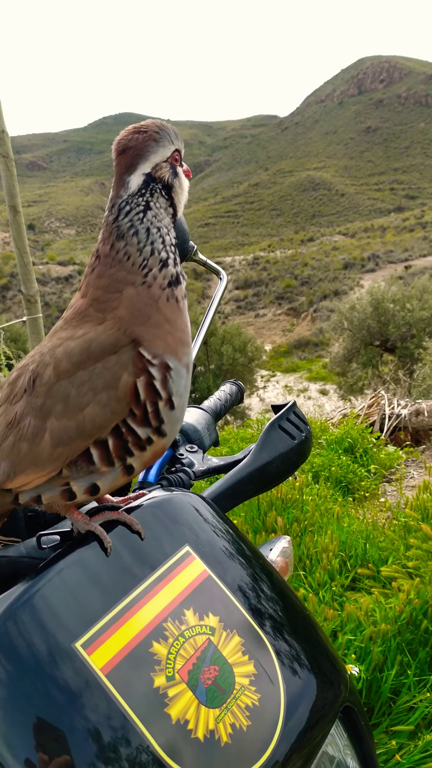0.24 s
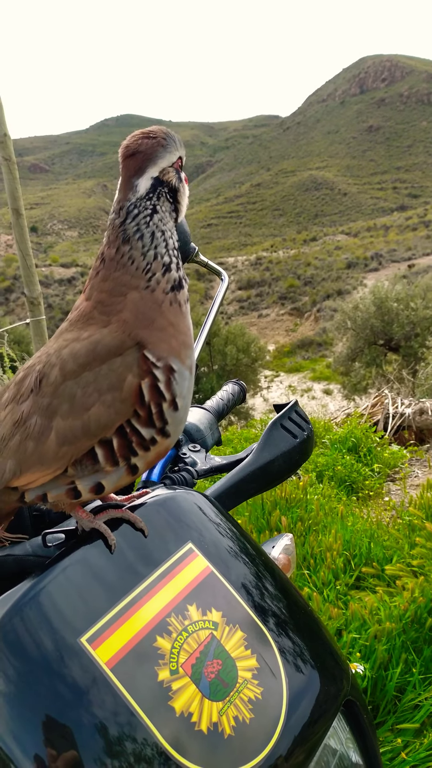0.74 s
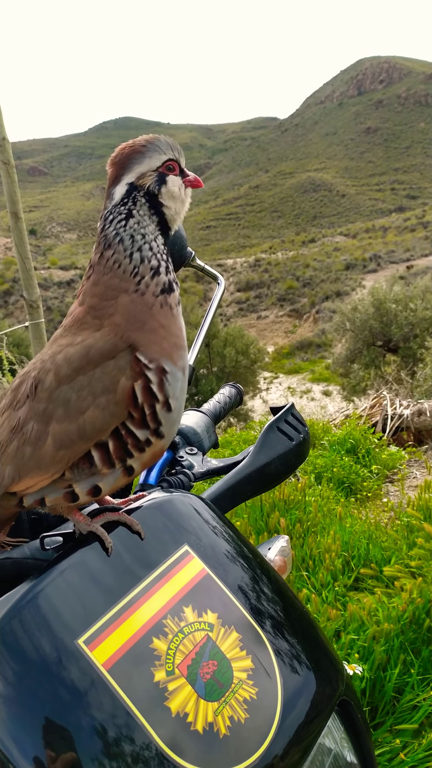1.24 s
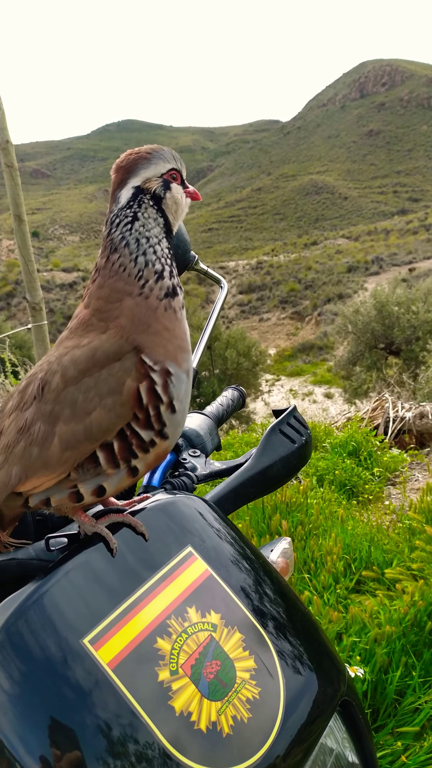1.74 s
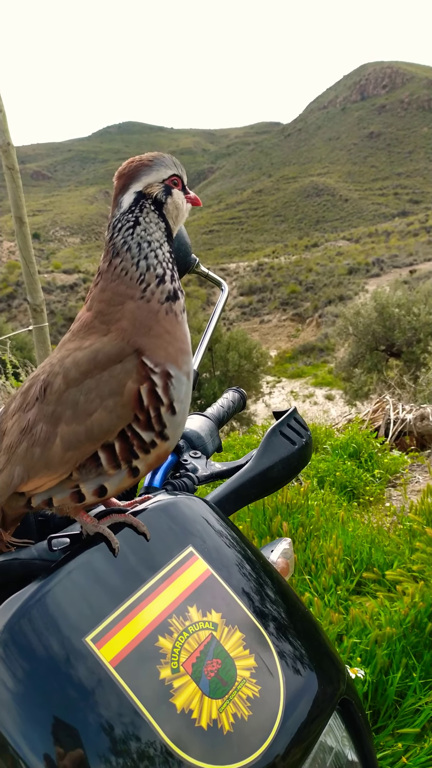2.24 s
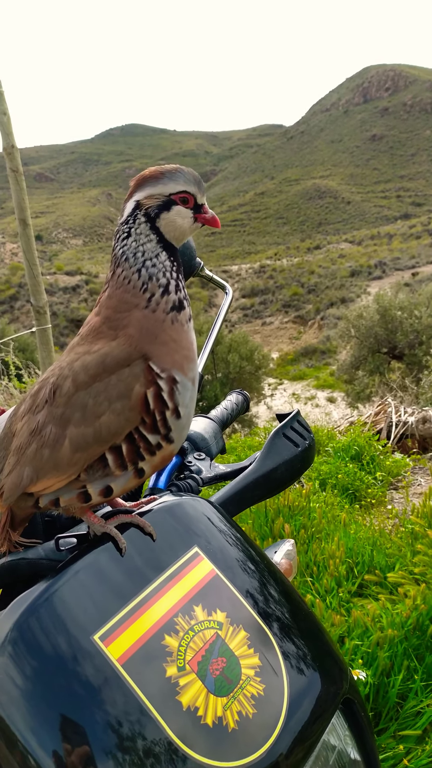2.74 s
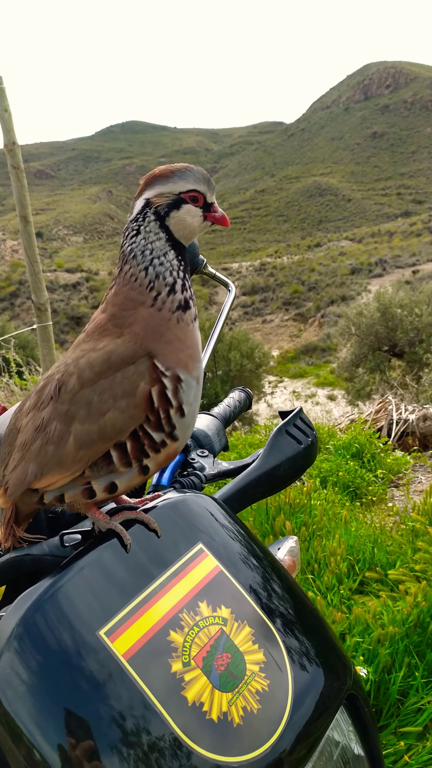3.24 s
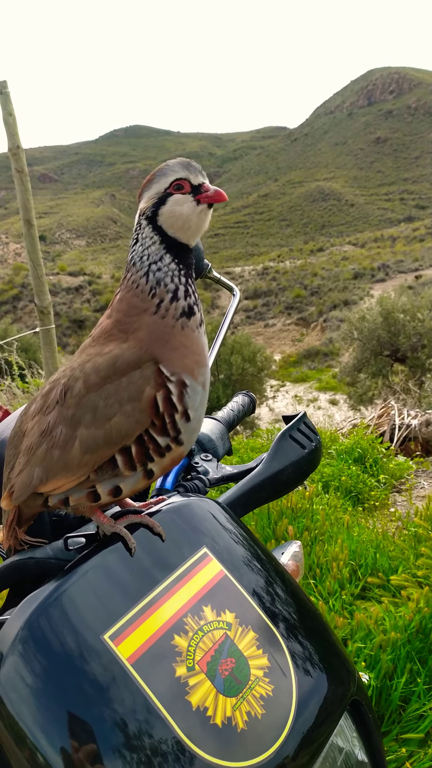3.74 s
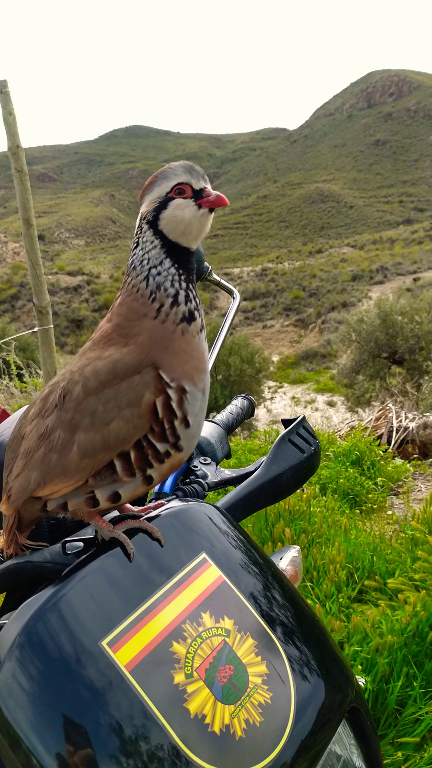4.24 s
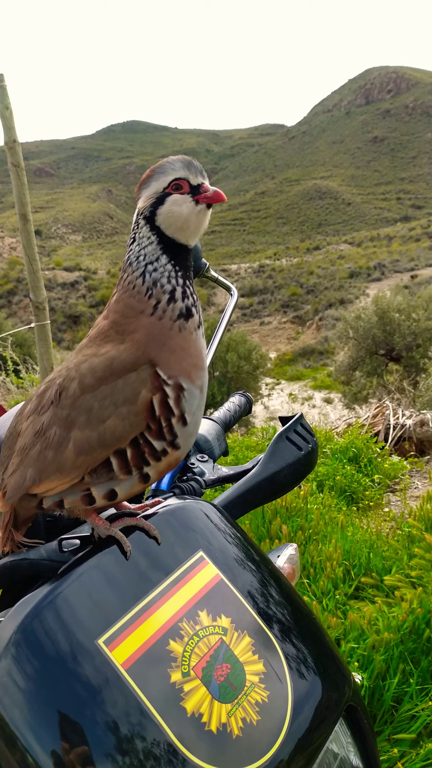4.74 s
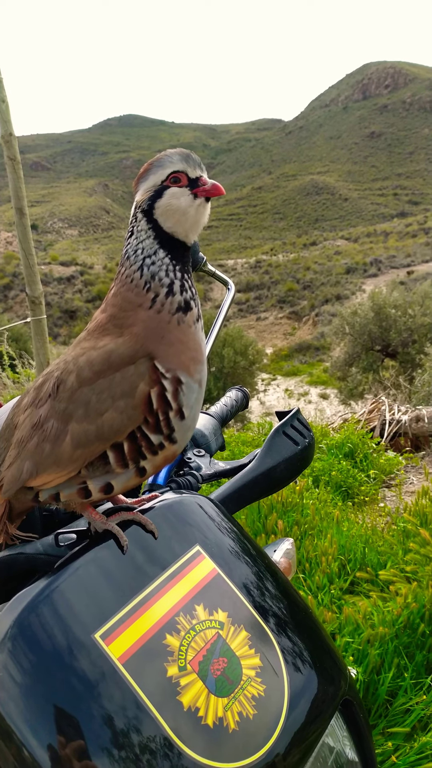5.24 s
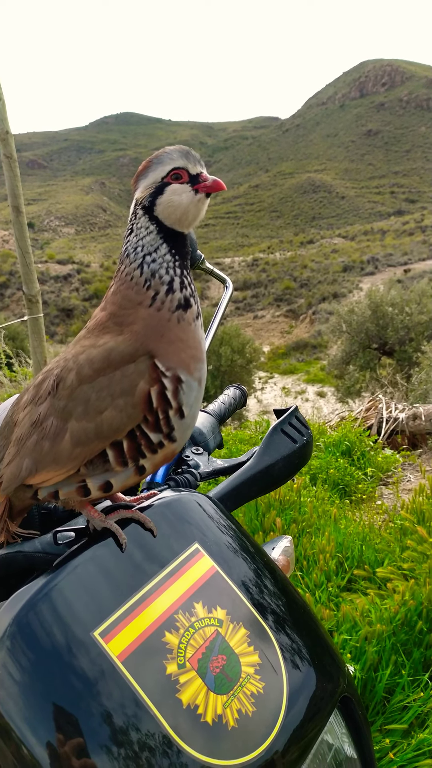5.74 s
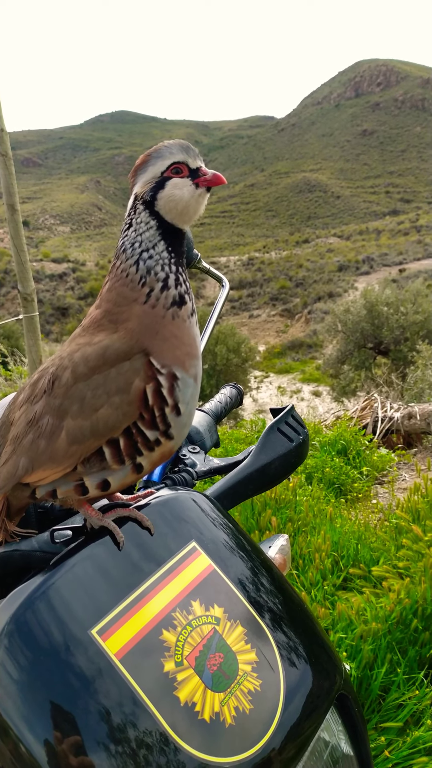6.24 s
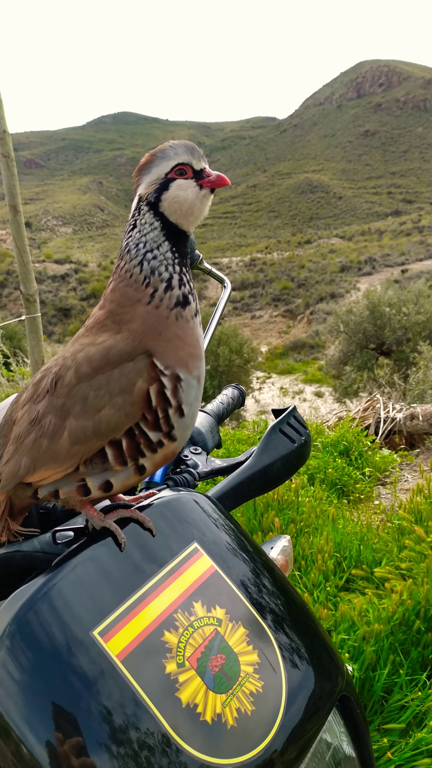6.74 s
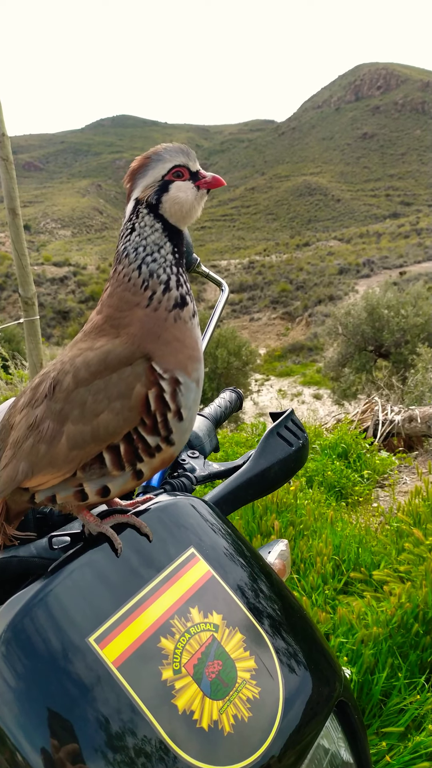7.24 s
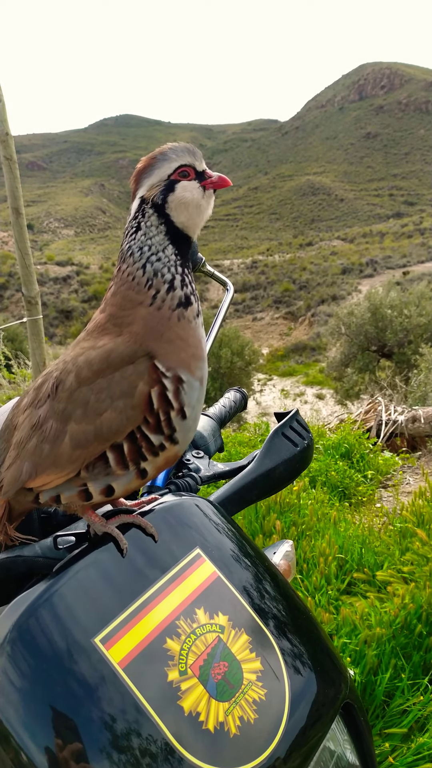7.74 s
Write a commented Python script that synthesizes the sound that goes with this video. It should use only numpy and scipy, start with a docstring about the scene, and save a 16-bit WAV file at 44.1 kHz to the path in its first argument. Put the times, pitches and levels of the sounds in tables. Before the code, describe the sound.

A partridge close by calls in clipped chucks and hoarse rasps, pauses with faint wheezes, then resumes, with light wind and late handling bumps.

```python
"""A red-legged partridge stands on a parked motorbike in open hill country, close to a hand-held camera.
It calls mostly in pairs, a clipped chuck and then a hoarse rasp, and wheezes softly between them.
Chucks are unsteady tones with air and a crack; rasps and wheezes are noise ringing in throat resonances.
Light wind, made of low noise, bumps the two microphone ports.
Short noise bursts make small touches of the camera, and late on a hand rubs against it."""
import sys
import numpy as np
from scipy import signal
from scipy.fft import rfft, irfft, next_fast_len
from scipy.io import wavfile
from scipy.ndimage import map_coordinates

SR = 44100
rng = np.random.default_rng(int(sys.argv[2]) if len(sys.argv) > 2 else 0)


def to_wav(sig):
    """Store sig (one row per channel, or 1-D mono) as 16-bit WAV at the path in sys.argv[1].

    Samples outside -1..1 are clipped; the rate is SR.
    """
    pcm = np.clip(np.atleast_2d(sig), -1, 1) * 32767
    pcm = np.round(pcm).astype(np.int16)
    wavfile.write(sys.argv[1], SR, pcm.T)  # frames by channels


N = 352800
TIME = np.arange(N) / SR

# How far the bill opens over time: wide at first, narrower after the pause, then wide again.
# Each row: time in seconds, opening (0 nearly shut, 1 wide).
BILL_OPENING = [(.5, 1.08), (1.35, 0.9), (3.6, 0.91), (4.1, 0.39), (4.9, 0.49), (5.7, .68), (6.3, 0.98),
                (7.8, 1.036)]
# Rubs of the hand on the camera.
# Each row: start in seconds, end in seconds, level in dB, fading in dB per second, opening squeak in dB.
HAND_RUBS = [(7.118, 7.272, -42.5, 18, -47.5), (7.536, 7.83, -43, 72, -39)]
RUB_ATTACK_S, RUB_RELEASE_S = 0.023, 0.042


def gain_of(db):
    """Turns decibels into amplitude."""
    return 10 ** (np.asarray(db) / 20)


def evened(x):
    """Scales a signal to an rms of 1."""
    return x / np.sqrt(np.mean(x ** 2) + 1e-20)


def at(curve, s):
    """Reads a control curve at time s."""
    return np.interp(s, *np.transpose(curve))


def read(points, hz, axis=1):
    """Reads one column of a table against frequency, on a logarithmic axis."""
    columns = np.transpose(points)
    return np.interp(np.log(hz + 1), np.log(columns[0] + 1), columns[axis])


def filtered(x, response):
    """Applies a response given as a function of frequency."""
    size = next_fast_len(x.shape[-1] + 2048)
    shaped = rfft(x, size) * response(np.fft.rfftfreq(size, 1 / SR))
    return irfft(shaped, size)[..., :x.shape[-1]]


def noise(spectrum, size=N):
    """Makes noise of rms 1 with the given spectrum."""
    return evened(filtered(rng.standard_normal(size), lambda hz: gain_of(read(spectrum, hz))))


def wobble(rate_hz, size=N):
    """Makes a smooth random wander of rms 1, mostly slower than the rate."""
    return evened(filtered(rng.standard_normal(size), lambda hz: np.exp(-(hz / rate_hz) ** 2)))


def throat(hz, modes, tilt=0):
    """Sums steep-sided resonances, leaning bright or dark by tilt in dB per octave."""
    power = sum(gain_of(db) ** 2 / (1 + ((hz - f) / width) ** 2 * 2) ** 2 for f, width, db in modes)
    lean = gain_of(tilt * np.log2(np.clip(hz, 500, 6000) / 1500))
    low_cut = hz ** 2 / (hz ** 2 + 250 ** 2)
    return np.sqrt(power) * lean * low_cut


def blown(modes, size, tilt=0):
    """Blows turbulent air, as noise of rms 1, through a set of resonances."""
    return evened(filtered(rng.standard_normal(size), lambda hz: throat(hz, modes, tilt)))


def swell(middle, half, db):
    """Gives power that rises and sinks in a bell around one moment."""
    return gain_of(db) ** 2 * np.exp(-((TIME - middle) / half) ** 2)


def add(mix, s, sound):
    """Mixes a sound in at time s."""
    part = mix[max(round(s * SR), 0):][:len(sound)]
    part += sound[:len(part)]


def chuck(s, db, top_hz, droop=0.1078, jitter=0.087, skew=0.089, size=4096):
    """The syrinx gives a few dozen unsteady cycles: pitch and level arch together, with air and a crack."""
    # Air noise at the usual pitch. Each row: frequency in Hz, relative level in dB.
    air_spectrum = [(200, -43.5), (400, -18.5), (650, 3), (1000, 1.5), (1350, 5), (1900, -3), (2450, -5),
                    (2900, -13.5), (3800, -20.5), (6000, -55), (9000, -41)]
    # The bright crack. Each row: frequency in Hz, relative level in dB.
    crack_spectrum = [(500, -6), (2000, 11), (3500, -22.5), (4400, -10), (5700, 2), (6500, -8.5),
                      (8700, -20.5), (10500, -11), (12500, -12.5), (14500, -19.5)]
    usual_hz, usual_half_s, shorten = 1388, 0.00616, 1.6
    pitch_ratio = top_hz / usual_hz

    # Higher chucks are shorter. u counts half lengths from the middle.
    half = usual_half_s * (1 / pitch_ratio) ** shorten
    u = (np.arange(size) - size / 2) / SR / half
    push = np.exp(-(u * (1 + skew * np.sign(u))) ** 2 / 2)  # it swells more slowly than it stops

    arch = np.maximum(1 - droop * (u + 0.27) ** 2, .72)
    hz = top_hz * arch * (1 + jitter * wobble(472, size))
    shimmer = 1 + .3 * wobble(400, size)
    tone = np.sqrt(2) * np.sin(2 * np.pi * np.cumsum(hz) / SR) * shimmer

    # Higher chucks are purer, and their air noise moves up with the pitch.
    air_db = -6 - 11 * np.log2(pitch_ratio)
    air = gain_of(air_db) * noise([(f * pitch_ratio, a) for f, a in air_spectrum], size)

    # The crack weakens in chucks softer than -24.5 dB and as the bill shuts.
    crack_db = -18 + .7 * min(db + 24.5, 0) - 13.5 * (1 - at(BILL_OPENING, s))
    crack_grit = evened(np.exp(.5 * wobble(520, size)))
    crack = gain_of(crack_db) * noise(crack_spectrum, size) * crack_grit * push

    note = push * (tone + air + crack)
    return s, gain_of(db) * note * np.linalg.norm(push) / np.linalg.norm(note)


def trail(db, under_db=-31, length_s=0.066, size=4096):
    """Air whistles on thinly for a moment after a chuck."""
    # Resonances of the whistle. Each row: frequency in Hz, width in Hz, relative level in dB.
    whistle_modes = [(720, 260, -16.5), (1030, 130, -7), (1210, 95, 5.5), (1433, 140, 2.5),
                     (1860, 90, -15.5), (2400, 1600, -22.5)]
    t = np.arange(size) / SR
    fade = np.exp(-(t / length_s) ** 4) * np.minimum(t / .005, 1)
    return gain_of(db + under_db) * blown(whistle_modes, size) * fade


def rasp(start, end, db, flutter_hz=61, taper_shut=2.0, taper_wide=0.96, lead_s=0.0052,
         dull_db=-8.5, dull_tilt=-5.0, size=16384):
    """Air forced through slack, fluttering membranes rings the throat; the edges of the note are duller."""
    # Resonances of the throat. Each row: frequency in Hz, width in Hz, relative level in dB with the
    # bill wide, relative level in dB with it nearly shut.
    throat_modes = [(631, 147, 0, -2), (1049, 129, 5, 1.5), (1245, 120, -4.5, 5), (1700, 290, 0.5, -7),
                    (1906, 145, 2, -6.5), (2392, 167, 2, 5), (2926, 200, 0, -28), (3500, 350, -5, -40.5),
                    (4060, 170, -16.5, -33), (4450, 184, -15, -31.5), (4890, 300, -19.5, -29),
                    (5390, 800, -23.5, -40.5), (7050, 1760, -35.5, -51), (10460, 600, -37, -73)]
    rise_shut_s, rise_wide_s = 0.034, .022  # time to the loudest moment
    opening = at(BILL_OPENING, start)
    top = start + rise_shut_s + opening * (rise_wide_s - rise_shut_s)
    t = top + (np.arange(size) - size / 2) / SR
    modes = [(f, width, shut + opening * (wide - shut)) for f, width, wide, shut in throat_modes]

    rise = np.clip(np.minimum((t - start) / (top - start), (end - t) / (end - top)), 0, 1)
    taper = taper_shut + opening * (taper_wide - taper_shut)
    push = np.sin(np.pi / 2 * rise) ** taper * np.minimum(rise / 0.47, 1)

    # The flutter is unsteady, and deeper with the bill open.
    turns = np.cumsum(flutter_hz * (1 + 0.36 * wobble(60, size))) / SR
    flaps = 1 + (.15 + .27 * opening) * np.cos(2 * np.pi * (turns - turns[size // 2]))
    grit = np.exp(.2 * wobble(500, size))
    rough_air = rng.standard_normal(size) * flaps * grit * push
    hoarse = filtered(rough_air, lambda hz: throat(hz, modes))

    # Duller air starts a little before the hoarse part and ends a little after it.
    flow = np.interp(t, [start - lead_s, top, end - .01, end + .009], [0, 1, .5, 0])
    dull = gain_of(dull_db) * blown(modes, size, dull_tilt) * flow
    return top, gain_of(db) * (hoarse * np.linalg.norm(push) / np.linalg.norm(hoarse) + dull)


def coo(s, db, pitch_hz, half_s=0.0111, fall=0.048, size=4096):
    """As the push ends, the membranes settle into a clean, sinking tone."""
    u = (np.arange(size) - size / 2) / SR / half_s
    turns = np.cumsum(pitch_hz * (1 - fall * u)) / SR
    return s, gain_of(db) * np.sqrt(2) * np.sin(2 * np.pi * turns) * np.exp(-u ** 2 / 2)


def wheeze(start, end, db, edge_s=0.019, arch=0.11, sharp=.08, settle_s=0.0219, size=8192):
    """Air drawn through the narrowed airway swells and sinks; its whistle starts sharp and settles."""
    # Resonances of the airway. Each row: frequency in Hz, width in Hz, relative level in dB.
    airway_modes = [(660, 250, -3.5), (1078, 190, -1.5), (1310, 65, 11), (1600, 150, -2.5), (1800, 93, -1),
                    (2116, 170, -5.5), (2666, 190, -4.5), (3220, 760, -18), (3890, 59, -12.5),
                    (5134, 90, -34), (6300, 320, -35.5), (8680, 1800, -45.5)]
    # Wheezes brighten as the bird gets worked up. Each row: time in seconds, tilt in dB per octave.
    brightening = [(2.5, 0.5), (3.6, 4), (5.2, 5), (8, 7)]
    t = np.arange(size) / SR
    inside = np.maximum(np.minimum(t, end - start - t), 0)  # seconds to the nearer end
    flow = np.minimum(inside / edge_s, 1) * (inside / inside.max() * 2 + 1e-9) ** arch
    air = blown(airway_modes, size, at(brightening, start))
    # Reading the air faster at first raises its pitch.
    reading_place = np.cumsum(1 + sharp * np.exp(-t / settle_s))
    return gain_of(db) * map_coordinates(air, [reading_place], mode="wrap") * flow


def partridge():
    """Gathers the notes that the bird makes with its breath in one dry track."""
    # Each row: middle in seconds, level in dB, top pitch in Hz (before the jitter).
    chuck_calls = [(.179, -27, 1480), (0.71, -58.5, 1700), (.785, -25, 1520), (1.215, -30, 1340),
                   (1.396, -51, 1250), (1.625, -28.5, 1371), (2.061, -59, 1250), (2.701, -59, 1250),
                   (3.683, -25.5, 2408), (3.965, -28, 1320), (4.031, -54, 1400), (4.373, -33.5, 1400),
                   (4.764, -29, 1430), (5.178, -28, 1350), (5.367, -57.5, 1400), (5.578, -30, 1350),
                   (5.939, -32, 1280), (6.09, -52.5, 1400), (6.507, -25, 1400), (6.781, -53, 1400),
                   (7.072, -28, 1400), (7.498, -53, 1350), (7.68, -26.5, 1430)]
    # Each row: start in seconds, end in seconds, level in dB.
    rasp_calls = [(0.263, 0.329, -35.5), (0.503, 0.6, -35), (0.882, 0.947, -35.5), (1.324, 1.383, -37),
                  (4.068, 4.115, -40.5), (4.459, 4.51, -39.5), (4.852, 4.9, -36.5), (5.275, 5.324, -35),
                  (5.668, 5.721, -35.5), (6.014, 6.067, -37.5), (6.236, 6.299, -36.5), (6.592, 6.65, -35.5),
                  (6.818, 6.883, -36.5), (7.152, 7.23, -35), (7.408, 7.486, -36.5), (7.767, 7.83, -36)]
    # Small clear coos that end some rasps. Each row: middle in seconds, level in dB, middle pitch in Hz.
    coo_calls = [(.577, -51, 600), (6.291, -48, 668), (6.875, -49, 707)]
    # Each row: start in seconds, end in seconds, level in dB.
    wheeze_breaths = [(1.048, 1.119, -60), (1.488, 1.553, -59), (1.752, 1.848, -58), (2.127, 2.233, -58.5),
                      (2.39, 2.513, -59.5), (2.769, 2.888, -59.5), (3.032, 3.17, -58), (3.298, 3.382, -61),
                      (3.372, 3.533, -57.5), (3.673, 3.822, -56.5), (4.107, 4.228, -58),
                      (4.387, 4.476, -57), (4.771, 4.865, -54), (5.057, 5.172, -55), (5.438, 5.561, -56.5),
                      (5.712, 5.867, -56.5), (6.164, 6.244, -55), (6.442, 6.564, -54.5),
                      (6.866, 6.98, -55.5), (7.541, 7.685, -58), (7.85, 7.988, -55.5)]
    bird = np.zeros(N)
    notes = [chuck(*row) for row in chuck_calls]
    notes += [rasp(*row) for row in rasp_calls]
    notes += [coo(*row) for row in coo_calls]
    for middle, sound in notes:
        add(bird, middle - len(sound) / 2 / SR, sound)
    for s, db, _ in chuck_calls:
        add(bird, s, trail(db))
    for row in wheeze_breaths:
        add(bird, row[0], wheeze(*row))
    return bird


def at_ports(x):
    """The camera body shades and delays the bird differently for each port."""
    # Each row: frequency in Hz, left minus right in dB, lag of the left in radians.
    port_differences = [(295, 4, .1), (607, 3.5, 0.95), (914, 2, 1.45), (1300, 4, 2.29), (1407, -2.5, 1.62),
                        (1465, -5.5, 0.94), (1712, -3.5, 2.91), (1940, 11, 0.47), (2170, 15, 1.8),
                        (2290, 3, 0.34), (2960, 9.5, 4.03), (4170, 7.5, 5.02), (6250, 11.5, 8),
                        (9900, 13, 10.9)]

    def port(hz, side):
        difference_db = read(port_differences, hz)
        balance = gain_of(side * difference_db / 2)
        keep_power = np.sqrt(np.cosh(np.log(gain_of(difference_db))))  # same total power in both ports
        lag = np.exp(-.5j * side * read(port_differences, hz, axis=2))
        return balance / keep_power * lag

    return np.array([filtered(x, lambda hz: port(hz, side)) for side in (1, -1)])


def scatter(x, wet_db=-31, t60_s=0.38):
    """Open ground and bushes give back only a faint, short tail of scattered sound."""
    t = np.arange(SR // 2) / SR
    tails = rng.standard_normal((2, len(t))) * gain_of(-60 * t / t60_s) * (t > .005)
    tails = tails / np.linalg.norm(tails[0])
    return gain_of(wet_db) * signal.fftconvolve(x[None], tails, axes=1)[:, :N]


def handling(brush_grain_db=2, rub_right_db=-8, shade_hz=5000, brush_right_db=-14):
    """Skin and cloth slide over the camera in fine slips; the right port hears them softer."""
    # Sound of skin. Each row: frequency in Hz, relative level in dB.
    rub_spectrum = [(100, 9), (300, 1), (550, -8), (1200, -5.5), (2200, -4.5), (2750, -6), (3300, -7),
                    (4500, -19), (6500, -16.5), (10500, -15), (13000, -27), (15000, -32)]
    # Sound of cloth. Each row: frequency in Hz, relative level in dB.
    brush_spectrum = [(1000, -24), (4000, -18), (7000, -6.5), (9000, -7), (10500, 2.5), (11400, -9),
                      (12200, -22), (15000, -28)]
    # Soft brushes of a sleeve. Each row: height in seconds, half length in seconds, level in dB.
    sleeve_brushes = [(1.3, 0.49, -83.5), (2.47, 0.43, -79), (3.305, .015, -77), (3.394, 0.019, -71)]
    slips = evened(gain_of(3.2 * wobble(220) + 2 * wobble(40)))
    pressure = np.zeros(N)
    for start, end, db, fading, _ in HAND_RUBS:
        edges = np.clip(np.minimum((TIME - start) / RUB_ATTACK_S, (end - TIME) / RUB_RELEASE_S), 0, 1)
        pressure += gain_of(db - fading * np.maximum(TIME - start, 0)) * edges
    # The right port also hears the rub duller.
    shaded = gain_of(rub_right_db) * filtered(noise(rub_spectrum), lambda hz: 1 / (1 + (hz / shade_hz) ** 2))
    rub = pressure * slips * np.array([noise(rub_spectrum), shaded])

    folds = evened(gain_of(brush_grain_db * wobble(73)))
    cloth = np.array([noise(brush_spectrum), gain_of(brush_right_db) * noise(brush_spectrum)])
    brush = np.sqrt(sum(swell(*row) for row in sleeve_brushes)) * folds * cloth
    return rub + brush


def burst(db, centre_hz, share, decay_s, size=8192):
    """A knock rings in one band, as wide as a share of its centre, and dies at once."""
    t = np.arange(size) / SR
    fade = np.exp(-t / decay_s) * np.minimum(t * centre_hz * 2, 1)
    band = filtered(rng.standard_normal(size), lambda hz: 1 / (1 + (2 * (hz / centre_hz - 1) / share) ** 2))
    sound = fade * band
    return gain_of(db) * sound * np.linalg.norm(fade) / np.linalg.norm(sound)


def touches(tick_width=0.96, tick_decay_s=.003, bump_width=0.79, bump_decay_s=0.022, right_db=-9.0):
    """Contacts around the camera ring as short bursts: clicks, ticks, bumps and squeaks, stronger on the left."""
    # Sharp clicks of something hard. Each row: time in seconds, level in dB.
    hard_clicks = [(3.2823, -32), (3.398, -43)]
    # What a click rings with.
    # Each row: centre in Hz, width as a share of the centre, decay in seconds, relative level in dB.
    click_modes = [(596, 2.1, 0.0028, -2.5), (1960, 0.64, .0011, 0), (9100, 0.17, 0.0014, -20.5)]
    # Tiny dry ticks. Each row: time in seconds, level in dB, centre in Hz.
    dry_ticks = [(0.117, -66, 5200), (.705, -69, 9500), (3.345, -59, 8100), (6.673, -63.5, 6030)]
    # Dull bumps of the hand. Each row: time in seconds, level in dB, centre in Hz.
    hand_bumps = [(3.178, -41.5, 100), (4.684, -54, 327), (5.861, -52.5, 130), (7.139, -39, 273),
                  (7.181, -43, 171), (7.226, -39.5, 217), (7.444, -32.5, 137), (7.543, -43.5, 280),
                  (7.578, -34.5, 112), (7.617, -40.5, 176)]
    out = np.zeros(N)
    for s, db in hard_clicks:
        add(out, s, sum(burst(db + mode_db, hz, share, decay_s) for hz, share, decay_s, mode_db in click_modes))
    for s, db, hz in dry_ticks:
        add(out, s, burst(db, hz, tick_width, tick_decay_s))
    for s, db, hz in hand_bumps:
        add(out, s, burst(db, hz, bump_width, bump_decay_s))
    # The skin squeaks as it first slips.
    for start, *_, db in HAND_RUBS:
        add(out, start + RUB_ATTACK_S / 2, burst(db, centre_hz=2570, share=.25, decay_s=0.02))
    return out * gain_of([[0], [right_db]])


def wind(breeze_left_db=-59, breeze_right_db=-66.5, lumps_db=3.0, air_db=-71, shared_db=-3):
    """Eddies of a breeze and its gusts bump each port separately, over the even hush of the valley."""
    # Low bumping noise. Each row: frequency in Hz, relative level in dB.
    wind_spectrum = [(15, 9), (35, 2), (65, -3.5), (120, -10.5), (180, -9), (300, -19), (500, -42.5),
                     (1000, -52), (3000, -74)]
    # The valley's hush. Each row: frequency in Hz, relative level in dB.
    hush_spectrum = [(30, 2.5), (100, -48.5), (180, 3), (300, -2.5), (500, 0), (800, -4), (1300, -9),
                     (2200, -15), (3500, -20.5), (6000, -23), (10000, -25), (12500, -36), (14000, -54.5)]
    # Each row: height in seconds, half length in seconds, left level in dB, right level in dB.
    wind_gusts = [(2.702, 0.1, -66, -51.5), (3.082, 0.042, -58, -46), (3.23, 0.085, -45, -64),
                  (3.802, 0.32, -58.5, -73), (5.05, 0.15, -54, -68), (6.592, 0.39, -62, -57.5),
                  (7.2, 0.043, -54, -40), (7.452, .22, -41.5, -53), (7.453, 0.033, -31.5, -55),
                  (7.573, 0.024, -32.5, -58), (7.9, 0.15, -49, -47)]
    left_power = gain_of(breeze_left_db) ** 2 + sum(swell(s, half, db) for s, half, db, _ in wind_gusts)
    right_power = gain_of(breeze_right_db) ** 2 + sum(swell(s, half, db) for s, half, _, db in wind_gusts)
    bumps = []
    for power in (left_power, right_power):
        lumps = evened(gain_of(lumps_db * wobble(7.7)))
        bumps.append(np.sqrt(power) * noise(wind_spectrum) * lumps)
    # Part of the hush is shared by the ports and part is separate.
    hush = gain_of(shared_db) * noise(hush_spectrum) + np.array([noise(hush_spectrum), noise(hush_spectrum)])
    return np.array(bumps) + gain_of(air_db) * evened(hush)


def scene():
    """Sums the bird, its faint tail, the hand and the wind at the two ports."""
    bird = partridge()
    return at_ports(bird) + scatter(bird) + handling() + touches() + wind()


def record(dry):
    """The recorder's band limit takes away the sound above its edge."""
    edge_hz = 14300
    low_pass = signal.firwin(255, edge_hz, window=("kaiser", 8), fs=SR)
    return signal.oaconvolve(dry, low_pass[None], "same")


dry = scene()
out = record(dry)
to_wav(out)
```